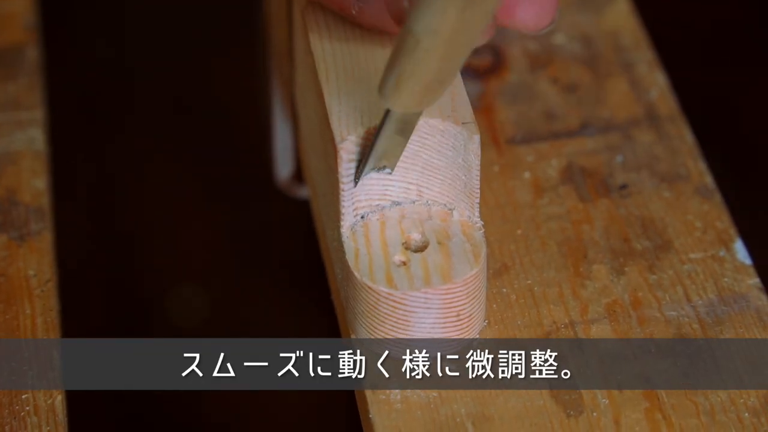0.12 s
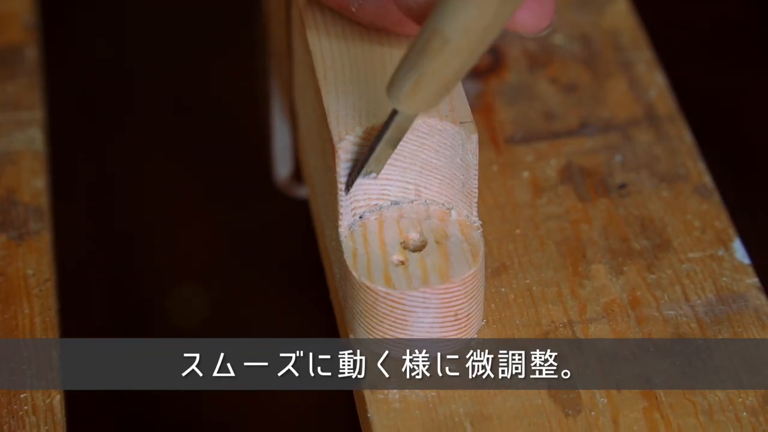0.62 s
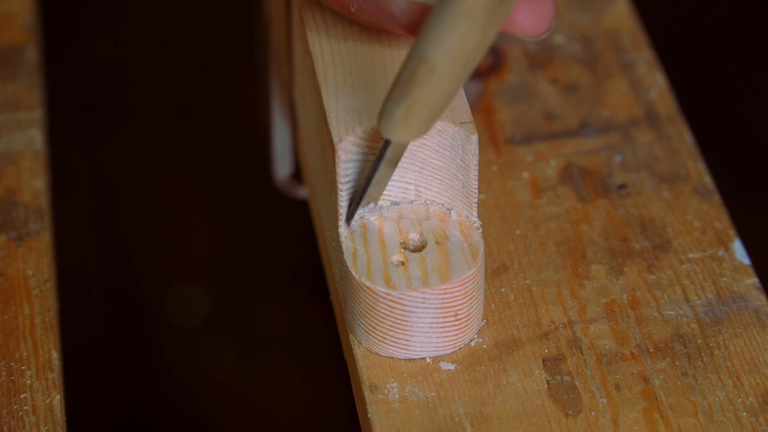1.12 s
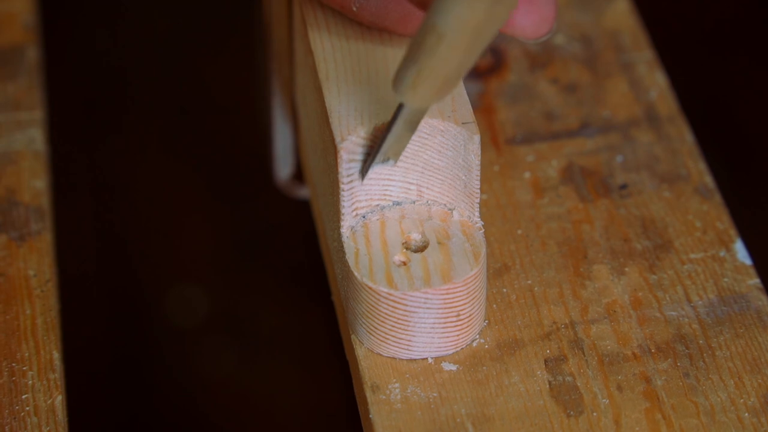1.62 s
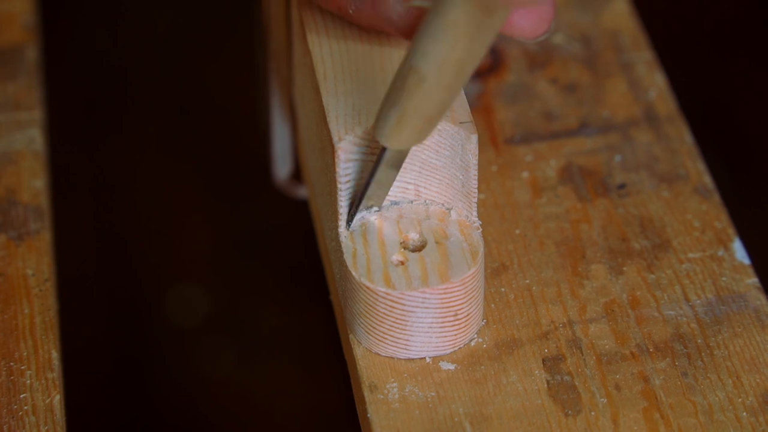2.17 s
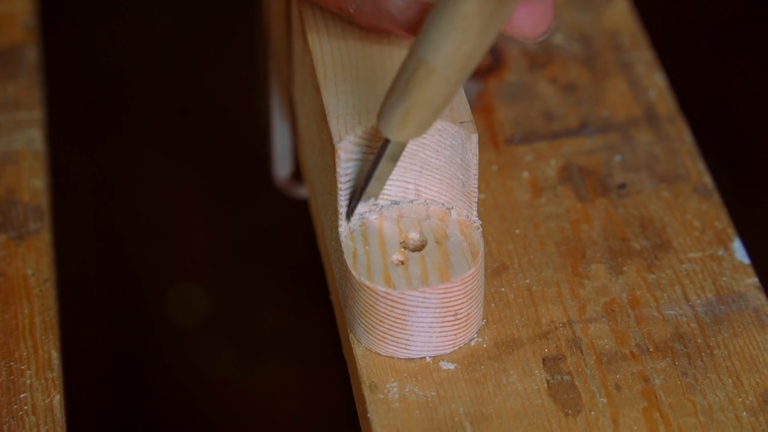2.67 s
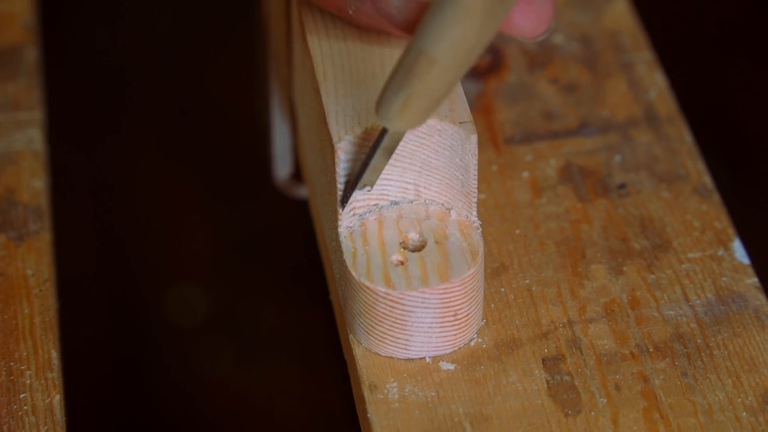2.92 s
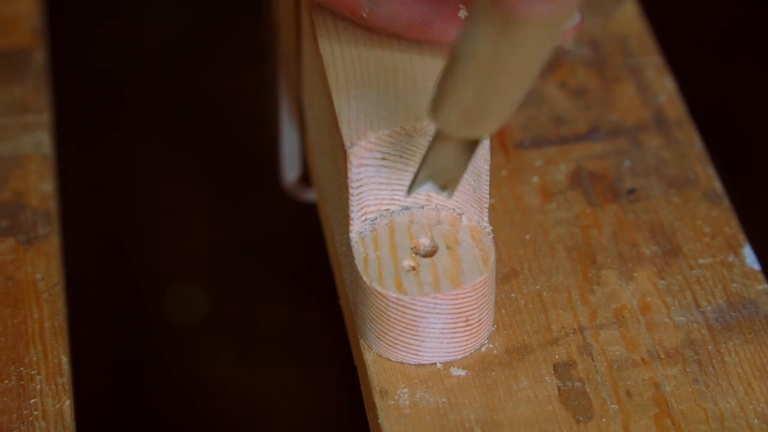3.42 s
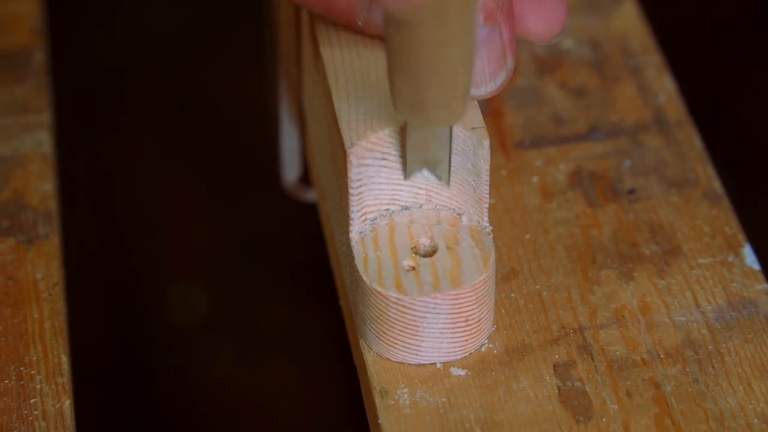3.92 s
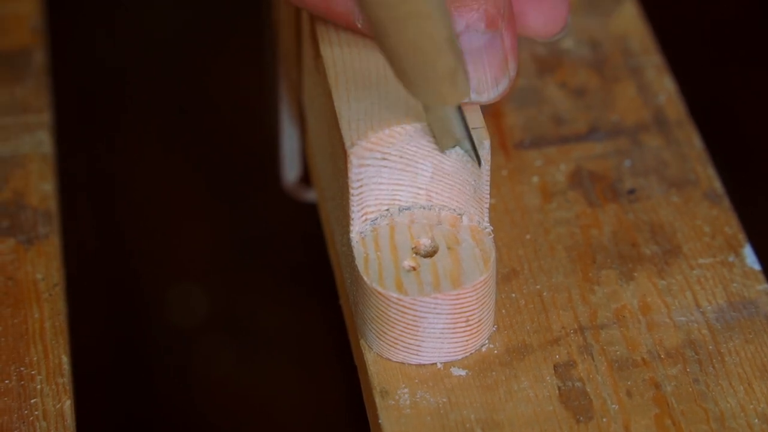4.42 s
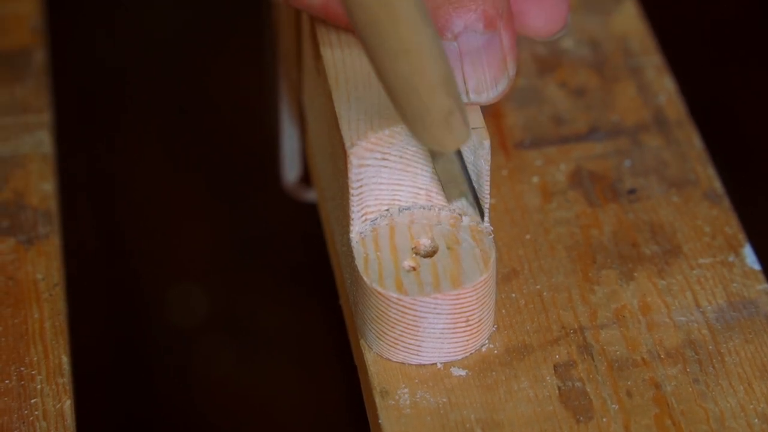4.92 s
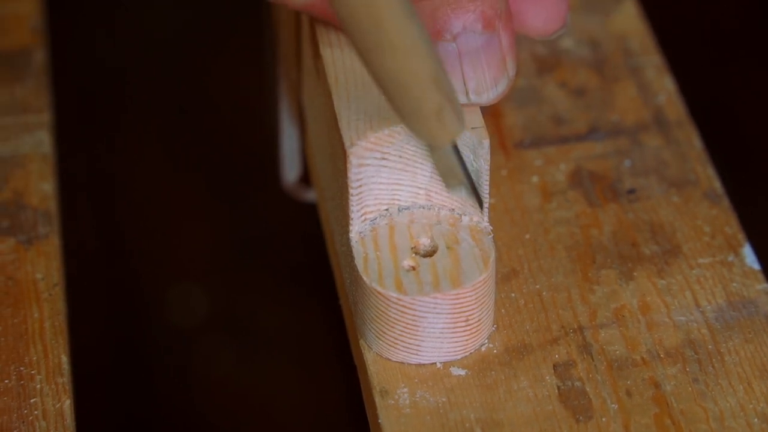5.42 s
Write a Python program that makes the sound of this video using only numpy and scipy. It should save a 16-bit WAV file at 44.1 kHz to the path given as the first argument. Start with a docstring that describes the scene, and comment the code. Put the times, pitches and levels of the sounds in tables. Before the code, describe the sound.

Close, dry mono pickup of a hand chisel paring a clamped wooden part. Quick crisp scrapes, uneven in strength, come about four a second with faint back drags between them and low bench bumps beneath. Just after three seconds the blade lifts with a dull thump and something rubs softly along the wood; then fewer, knockier cuts follow over quiet room noise.

```python
"""Hand chisel on a clamped part

A hand chisel pares a wooden part clamped on a workbench, in quick short strokes, and drags lightly back.
Random clicks of tearing fibres ring resonances of blade, part and bench top and make a treble hiss.
Each shove rocks the bench as a low gliding tone with a slower sway of noise; cuts add dull knocks.
A rub along the top follows a thumping lift; a brief early hum and room and microphone noise lie under it."""
import sys
import numpy as np
from scipy import signal
from scipy.fft import rfft, irfft
from scipy.io import wavfile

SR = 44100
rng = np.random.default_rng(int(sys.argv[2]) if len(sys.argv) > 2 else 0)


def log_audio(samples):
    """Write samples as a 16-bit WAV file to the path given in sys.argv[1]."""
    # one column per channel
    frames = np.atleast_2d(samples).T
    # limit to full scale, then quantise
    limited = np.clip(frames, -1, 1)
    pcm = np.round(limited * 32767).astype(np.int16)
    wavfile.write(sys.argv[1], SR, pcm)


def convert_level_to_amplitude(level_db):
    """Map a level in decibels to its linear amplitude factor."""
    exponent = np.asarray(level_db, float) / 20
    return 10 ** exponent


N = 245195   # length in samples

# paring cuts, the edge pushed forward, before the mix of blade, wood and hiss:
# (time of the height [s], scrape level [dB], rise [ms], fall [ms], fibre hiss over scrape [dB])
CUTS = [(0.002, -52.5, 27, 17.5, -9), (0.235, -54.5, 26.3, 13.6, -6.5), (0.441, -49.5, 20, 13.3, -22),
        (0.691, -44, 17.3, 11.2, -7), (0.724, -45.5, 5.2, 11.8, -7.5), (0.771, -46, 9.9, 11.2, -10),
        (0.905, -51, 13.5, 28, -9), (0.952, -43.5, 14.4, 13, -9), (1.087, -58, 12, 15, -25),
        (1.157, -38, 14.5, 10.3, -4.5), (1.176, -38, 14, 11.3, -36), (1.358, -46, 22, 16.2, -7.5),
        (1.577, -48, 23.5, 12.3, -7), (1.726, -56.5, 22, 40, -7.5), (1.776, -41.5, 12.8, 11.7, -10.5),
        (1.915, -63, 7.1, 17, -8), (1.945, -47.5, 16, 9.6, -6.5), (1.985, -43.5, 6.6, 12.7, -29),
        (2.172, -50.5, 17, 9, -7.5), (2.362, -60, 8.9, 8.2, -22), (2.419, -43.5, 10.3, 13.3, -10),
        (2.493, -35.5, 7.8, 16.2, -5.5), (2.684, -45, 4.6, 21.4, -6.5), (2.724, -52, 23, 11, -10),
        (2.907, -51, 9.3, 20, -7), (2.932, -42, 17.7, 12.4, -8), (2.993, -34, 15, 15.3, -8.5),
        (3.204, -48, 24.3, 15, -6), (3.799, -58, 13, 5.7, -25), (3.852, -44, 6.9, 20, -7.5),
        (3.869, -42, 5.8, 6.5, -6.5), (4.059, -61.5, 6.4, 9.4, -5.5), (4.116, -46, 7.1, 5.6, -29),
        (4.148, -38, 11.1, 14, -9), (4.23, -62, 11, 7.8, -0.5), (4.365, -62, 5.8, 16, -27),
        (4.624, -51.5, 10.7, 31.5, -5.5), (4.646, -43.5, 14, 7.2, -9), (4.837, -53, 19, 14, -7.5),
        (4.891, -37.5, 9.4, 10.4, -7.5), (5.218, -37, 10.7, 12.9, -7), (5.39, -46.5, 28, 8.3, -6.5),
        (5.531, -47, 13.1, 7.2, -9.5), (5.558, -48, 8.8, 17.5, -7)]
# how strongly the wood rings and the part knocks as the work goes on; knocks are heaviest late:
# (time [s], wood over a cut [dB], wood over a drag [dB], knock over a medium cut [dB])
RING_AND_KNOCK = [(0.3, 4, 1, 1.5), (1.0, 2.5, -4, 1.5), (3.2, 1.5, -4, -2), (3.6, 2.5, 4, -1),
                  (4.4, 7, 1, 6), (4.6, 1.5, -6, 6.5), (5.2, 4.5, 4, 8)]
# resonances of part and bench top: (frequency [Hz], width [Hz], level [dB])
WOOD = [(278, 76, -7.5), (511, 56, 6), (631, 32.2, 2), (833.5, 145, 5), (925, 107, 4), (1164, 52, 4)]
MEDIUM_DB = -45   # level of a medium cut or shove
LIFT_S = 3.322   # the blade is lifted


def rms_one(x):
    """Scales x to an rms of one."""
    return x / np.sqrt(np.mean(x ** 2) + 1e-20)


def in_time(s, values):
    """Straight lines between values set at times in seconds."""
    return np.interp(np.arange(N) / SR, s, values)


def drift(rate_hz):
    """Slow chance of spread one: noise through two equal poles, run at a fortieth of the sample rate."""
    r = np.exp(-80 * np.pi * rate_hz / SR)
    noise = rng.standard_normal(N // 40 + 2002)
    slow = signal.lfilter([1], [1, -2 * r, r * r], noise)[2000:]   # skips the settling
    return np.interp(np.arange(N) / 40, np.arange(len(slow)), rms_one(slow))


def coloured(x, spectrum):
    """Gives x a spectrum drawn on a log-frequency axis; rms one."""
    hz, level_db = np.transpose(spectrum)
    bins = np.arange(N // 2 + 1) * SR / N + 1
    gain = convert_level_to_amplitude(np.interp(np.log(bins), np.log(hz), level_db))
    return rms_one(irfft(rfft(x) * gain, N))


def resonance(x, hz, width_hz):
    """Two poles ring at one pitch; the gain is one on top."""
    r = np.exp(-np.pi * width_hz / SR)
    zeros = np.array([1, 0, -1]) * (1 - r * r) / 2
    return signal.lfilter(zeros, [1, -2 * r * np.cos(2 * np.pi * hz / SR), r * r], x)


def swells(s, level_db, rise_ms, fall_ms, steep):
    """Each event stands about half as high one rise before and one fall after its height; powers add."""
    power, t = np.full(N, 1e-20), np.arange(N) / SR
    for at, db, rise, fall in zip(s, level_db, rise_ms, fall_ms):
        near = slice(max(0, int((at - .15) * SR)), int((at + .15) * SR))
        lag_ms = 1000 * (t[near] - at)
        share = np.abs(lag_ms / np.where(lag_ms < 0, rise, fall))
        power[near] += convert_level_to_amplitude(2 * db - 11.03 * share ** steep)
    return np.sqrt(power)


def slices(x, centres_hz):
    """Splits x into overlapping slices of the spectrum that add up to the whole."""
    bins = np.arange(N // 2 + 1) * SR / N + 1
    place = np.interp(np.log(bins), np.log(centres_hz), np.arange(len(centres_hz)))
    spectrum = rfft(x)
    return [irfft(spectrum * np.maximum(1 - np.abs(place - k), 0), N) for k in range(len(centres_hz))]


def body(force, effort, modes, uneven_db, between_db, between_hz):
    """The force drives modes whose strengths wander; a broad bed fills the gaps."""
    steady = sum(convert_level_to_amplitude(db) * resonance(force, hz, width) for hz, width, db in modes)
    rung = 0
    for k, (hz, width, db) in enumerate(modes):
        push = force * effort * convert_level_to_amplitude(uneven_db * drift(8.9))   # the contact moves
        rung = rung + (-1) ** k * convert_level_to_amplitude(db) * resonance(push, hz, width)   # neighbours in opposite sign
    band = signal.butter(2, between_hz, "band", fs=SR, output="sos")
    bed = signal.sosfilt(band, force * effort) / np.std(signal.sosfilt(band, force))
    return rung / np.std(steady) + convert_level_to_amplitude(between_db) * bed


def tearing(per_s, spread_db):
    """Fibres let go as clicks of uneven size and random sign at chance moments; rms one."""
    sizes = convert_level_to_amplitude(spread_db * np.minimum(rng.exponential(1, N), 5)) * rng.choice([-1, 1], N)
    return rms_one(sizes * (rng.random(N) < per_s / SR))


def strokes():
    """All contacts of the edge: time, scrape level, rise, fall, wood and hiss levels over the scrape."""
    # light back drags of the edge, and one short click at 4.719 s:
    # (time of the height [s], scrape level [dB], length [ms])
    drags = [(0.113, -62, 29), (0.268, -67.5, 12.5), (0.318, -64, 37), (0.515, -68.5, 37),
             (0.818, -68.5, 40), (1.026, -65, 44), (1.249, -66, 48), (1.454, -61, 37), (1.536, -66, 24),
             (1.653, -67.5, 35), (1.835, -66.5, 49), (2.041, -67.5, 43), (2.262, -66.5, 44),
             (2.58, -61, 37), (2.816, -64.5, 39), (3.092, -64.5, 39), (3.28, -67.5, 39), (3.94, -63.5, 46),
             (4.397, -67, 10), (4.573, -63, 13), (4.719, -57, 6.1), (4.743, -58.5, 34), (4.977, -60.5, 52),
             (5.096, -67.5, 29), (5.298, -61, 34), (5.468, -60.5, 32)]
    drag_rise_share, drag_hiss_db = 0.32, -1   # share of the length spent rising; hiss over scrape
    when, cut_wood_db, drag_wood_db, _ = np.transpose(RING_AND_KNOCK)
    rows = [(s, db, rise, fall, np.interp(s, when, cut_wood_db), hiss_db)
            for s, db, rise, fall, hiss_db in CUTS]
    rows += [(s, db, drag_rise_share * ms, (1 - drag_rise_share) * ms,
              np.interp(s, when, drag_wood_db), drag_hiss_db) for s, db, ms in drags]
    rows += [(LIFT_S, -54.5, 10.6, 5.8, 5, -20)]   # the lift, in the same columns
    return np.transpose(rows)


def fibre_hiss(force):
    """The tearing force is coloured to the treble; each slice of it comes and goes by itself."""
    # fibre hiss: (frequency [Hz], level per Hz [dB])
    fibres = [(4000, -1), (7000, -1.5), (9000, -5.5), (10500, -7), (13000, -9), (15300, -7.5)]
    # tilt of the hiss above 8500 Hz: (time [s], tilt [dB per octave])
    dulling = [(1.5, -10.5), (3.2, -14), (3.5, -12)]
    hiss = coloured(force, [(1800, -67)] + fibres + [(15800, -70)])
    tilt_db = in_time(*np.transpose(dulling))
    centres_hz = np.geomspace(3200, 15400, 12)
    patchy = 0
    for hz, part in zip(centres_hz, slices(hiss, centres_hz)):
        gain_db = 2.0 * drift(4.7) + tilt_db * max(0, np.log2(hz / 8500))
        patchy = patchy + convert_level_to_amplitude(gain_db) * part
    return patchy


def chisel():
    """One tearing force rings the blade and the wood and hisses in the fibres, with sparser splinters."""
    # resonances of blade and handle: (frequency [Hz], level [dB])
    blade_modes = [(1630, 21), (1980, 20), (2330, 12.5), (2680, 12), (3250, -45), (3440, -21), (4250, -0.5),
                   (6830, -8)]
    modes = [(hz, .065 * hz, db) for hz, db in blade_modes]   # each width a share of its pitch
    s, scrape_db, rise, fall, wood_db, hiss_db = strokes()
    force = tearing(6000.0, spread_db=1.5) * convert_level_to_amplitude(1.44 * drift(58.0))   # the edge judders in the cut
    force = force + convert_level_to_amplitude(-4) * tearing(350.0, spread_db=2.2)   # lone splinters
    blade_effort = swells(s, scrape_db, rise, fall, 2.19)
    blade = body(force, blade_effort, modes, uneven_db=3.0, between_db=1.5, between_hz=(1000, 3600))
    wood_effort = swells(s, scrape_db + wood_db, rise, fall, 2.43)
    wood = body(force, wood_effort, WOOD, uneven_db=0.65, between_db=-13.5, between_hz=(250, 1400))
    hiss = fibre_hiss(force) * swells(s, scrape_db + hiss_db, rise, fall, 2.7)
    return convert_level_to_amplitude(-3.5) * blade + convert_level_to_amplitude(3.5) * wood + convert_level_to_amplitude(0.5) * hiss


def bench():
    """The bench rocks under each shove, lower for harder ones, with a slower sway that lingers."""
    # shoves that rock the bench: (time of the height [s], level [dB], rise [ms], fall [ms])
    shoves = [(0.01, -39.5, 34, 17.6), (0.239, -42.5, 9.9, 25), (0.451, -43, 20, 10),
              (0.693, -39.5, 24, 15), (0.735, -34.5, 10, 13.6), (0.774, -33, 6.2, 16.6),
              (0.932, -42.5, 14, 5.2), (0.959, -31.5, 5, 17), (1.1, -45, 46, 23), (1.159, -27.5, 2.9, 19),
              (1.371, -36.5, 29, 15), (1.548, -49.5, 28, 35), (1.584, -33.5, 6.8, 20.6),
              (1.734, -36, 28, 10.6), (1.787, -32, 28.6, 9.9), (1.852, -49, 17, 10),
              (1.954, -32.5, 11.7, 6.3), (1.996, -38, 17, 10.3), (2.19, -43.5, 4.9, 13),
              (2.432, -49.5, 31, 6.7), (2.501, -27.5, 8.1, 14.8), (2.69, -40.5, 6.8, 5.4),
              (2.726, -38.5, 12, 16.6), (2.915, -43.5, 7.4, 6.2), (2.949, -40, 13, 15),
              (3.006, -25.5, 24.6, 16.5), (3.076, -48.5, 6, 15), (3.129, -44.5, 23, 10.7),
              (3.225, -33, 24, 6.5), (3.327, -43, 14, 24), (3.868, -35.5, 6.9, 20.7),
              (4.066, -50.5, 7.6, 19), (4.158, -33.5, 23, 10), (4.64, -37.5, 1.1, 18),
              (4.848, -44.5, 26.3, 5.9), (4.899, -34.5, 3.6, 11.3), (5.223, -35, 3.4, 20),
              (5.393, -51.5, 34, 23), (5.542, -33.5, 13, 8.2)]
    # shape of the sway: (frequency [Hz], level per Hz [dB])
    sway_colour = [(6, -20), (14, 0), (28, 0), (42, -8), (60, -22), (120, -50), (500, -110)]
    # slow sway below the rocking pitch: (time [s], level over the lingering shove [dB])
    sway_levels = [(0, -12), (1.3, -13.5), (2.4, -6), (3.2, -26), (3.4, -5), (4.2, -4), (4.6, -7.5),
                   (5.25, 0)]
    s, level_db, rise, fall = np.transpose(shoves)
    rock_hz = 73 - 0.32 * (level_db - MEDIUM_DB)
    wavering_hz = in_time(s, rock_hz) * (1 + 0.053 * drift(14.4))
    push = swells(s, level_db, rise, fall, 8.2)
    rocking = push * np.sin(2 * np.pi * np.cumsum(wavering_hz) / SR)
    rocking = rocking + convert_level_to_amplitude(-1.5) * resonance(rocking, 59.7, 21.3)   # free ringing of the bench
    settle = convert_level_to_amplitude(-60 / (0.39 * SR))   # the power of a shove falls by 30 dB in 0.39 s
    lingering = np.sqrt(signal.lfilter([1 - settle], [1, -settle], push ** 2))
    sway = coloured(rng.standard_normal(N), sway_colour)
    return rocking + convert_level_to_amplitude(in_time(*np.transpose(sway_levels))) * lingering * sway


def clamp_knocks():
    """Every cut, and the lift, knocks the part in its clamp: a dull burst of low noise."""
    s, scrape_db, *_ = np.transpose(CUTS)
    when, *_, over_db = np.transpose(RING_AND_KNOCK)
    knock_db = MEDIUM_DB + 0.68 * (scrape_db - MEDIUM_DB) + np.interp(s, when, over_db)
    s = np.append(s - 0.00225, LIFT_S - 0.0054)   # each knock peaks a little early
    knock_db = np.append(knock_db, -37.5)   # the lift
    knock = swells(s, knock_db, np.full(len(s), 6), np.full(len(s), 18.1), 1.3)
    thud = coloured(rng.standard_normal(N), [(50, 3.5), (105, 8.0), (140, -1.5), (220, -8.0), (330, -8),
                                            (500, -46), (2000, -110)])
    return knock * thud


def thump():
    """One blow rings two low, damped modes just before the blade comes free."""
    # modes of the blow: (frequency [Hz], width [Hz], level before decay [dB])
    thump_modes = [(139, 60, -44), (304, 97, -45)]
    t = np.maximum(np.arange(N) / SR - LIFT_S + 0.00904, 0)
    return sum(convert_level_to_amplitude(db) * np.sin(2 * np.pi * hz * t) * np.exp(-np.pi * width * t)
               for hz, width, db in thump_modes)


def slide():
    """Something slides on the bench top: dull noise rings the same wood, with two thin whistles."""
    # effort of the slide: (time [s], level [dB])
    slide_levels = [(3.309, -78), (3.36, -48.5), (3.5, -51.5), (3.65, -54.5), (3.8, -63.5), (4.05, -65.5),
                    (4.22, -53.5), (4.4, -63.5), (4.602, -58), (5.0, -68), (5.5, -69)]
    # whistles: (frequency [Hz], width of each of two passes [Hz], level where the slide is hardest [dB])
    slide_whistles = [(6460, 130, -86), (7030, 90, -87)]
    wobble_db = 1.2
    s, level_db = np.transpose(slide_levels)
    path_db = np.interp(np.arange(N) / SR, s, level_db, left=-120)
    effort = convert_level_to_amplitude(path_db + wobble_db * drift(6.3))
    rub = coloured(rng.standard_normal(N),   # a soft contact is dull
                   [(250, -5), (480, 2.0), (900, -9), (1300, -7.5), (3000, -23.5)])
    air = rng.standard_normal(N)
    whistles = sum(convert_level_to_amplitude(db) * rms_one(resonance(resonance(air, hz, width), hz, width))
                   for hz, width, db in slide_whistles)
    rubbed_wood = body(rub, effort, WOOD, wobble_db, between_db=-12, between_hz=(350, 3500))
    return rubbed_wood + whistles * effort / effort.max()


def hum():
    """Noise through two narrow resonances gives a faint wavering hum that dies away early."""
    # hum: (frequency [Hz], width of each pass [Hz], level at the start [dB], time to fall by 20 dB [s])
    hum_settings = (336, 4, -67, 0.5)
    hz, width, level_db, fade_s = hum_settings
    tone = resonance(resonance(rng.standard_normal(N), hz, width), hz, width)
    fade_db = -20 * (np.arange(N) / SR / fade_s) ** 2
    return convert_level_to_amplitude(level_db + fade_db) * rms_one(tone)


def room_floor():
    """Quiet room and microphone noise: steady noise, strongest in the lows."""
    # shape of the noise: (frequency [Hz], level per Hz [dB])
    floor_colour = [(15, -2), (30, -9.5), (70, -4), (170, -19), (500, -22.5), (900, -28), (1800, -36),
                    (3000, -40), (5000, -41), (6800, -36), (8400, -34), (9400, -38.5), (10200, -45.5),
                    (13000, -46.5), (15600, -47)]
    return convert_level_to_amplitude(-58.5) * coloured(rng.standard_normal(N), floor_colour)


def scene():
    """The chisel work, the bench under it and the quiet background, in one channel."""
    work = chisel() + slide()
    low = bench() + clamp_knocks() + thump()
    return (work + low + room_floor() + hum())[None]


def roll_off(x):
    """The treble ends steeply here."""
    return signal.sosfilt(signal.butter(12, 15710, fs=SR, output="sos"), x)


def record(dry):
    """Puts the finished mix through roll_off()."""
    return roll_off(dry)


dry = scene()
out = record(dry)
log_audio(out)
```